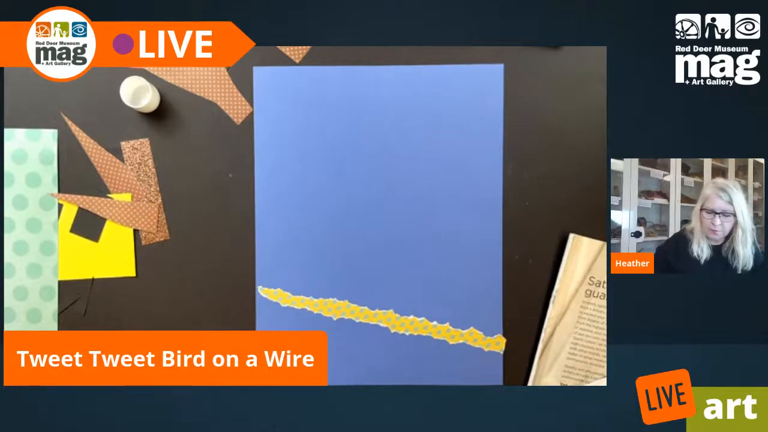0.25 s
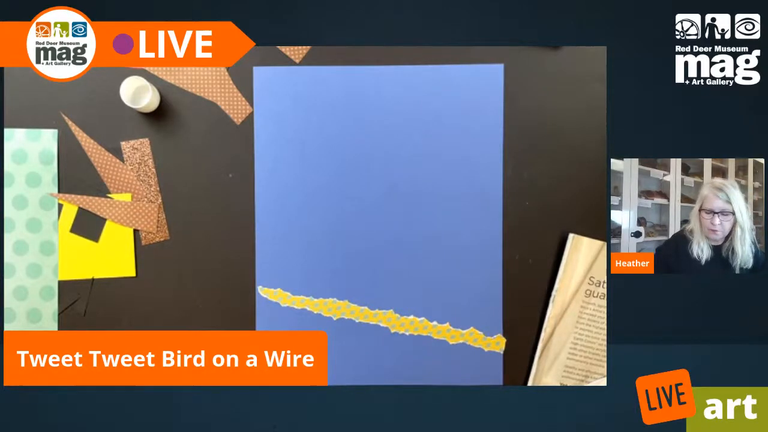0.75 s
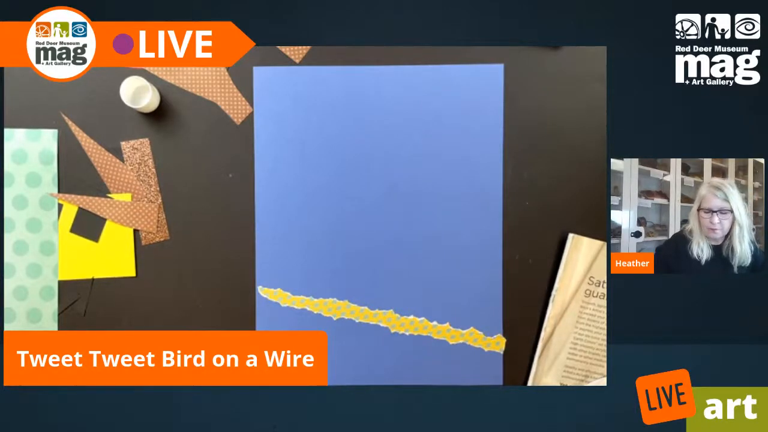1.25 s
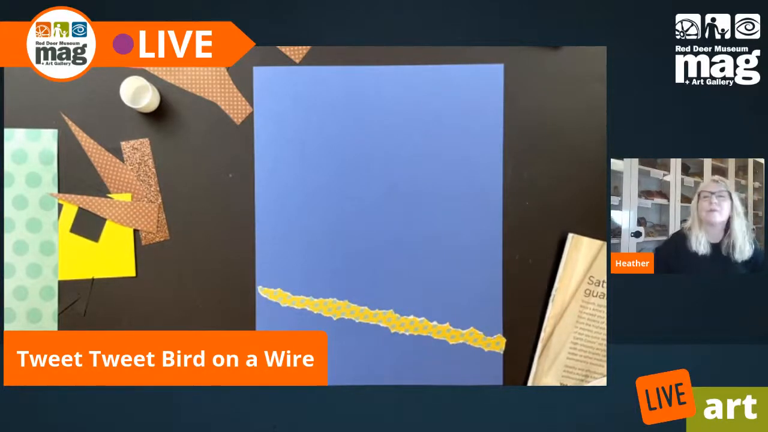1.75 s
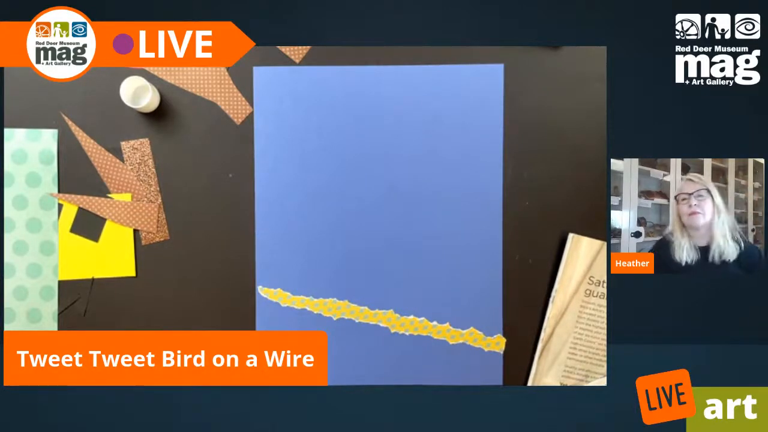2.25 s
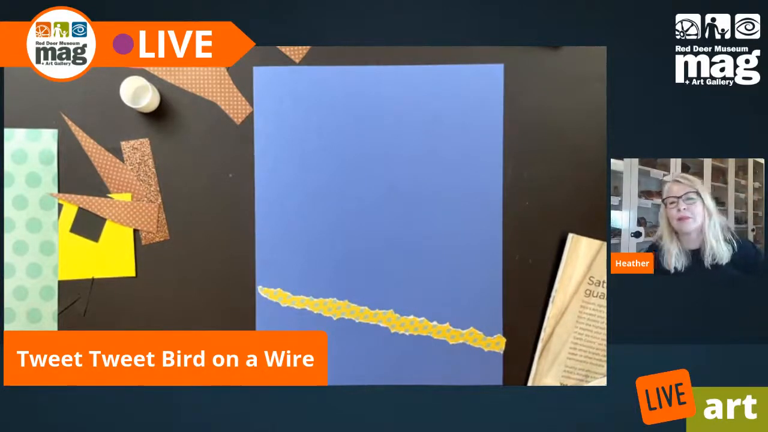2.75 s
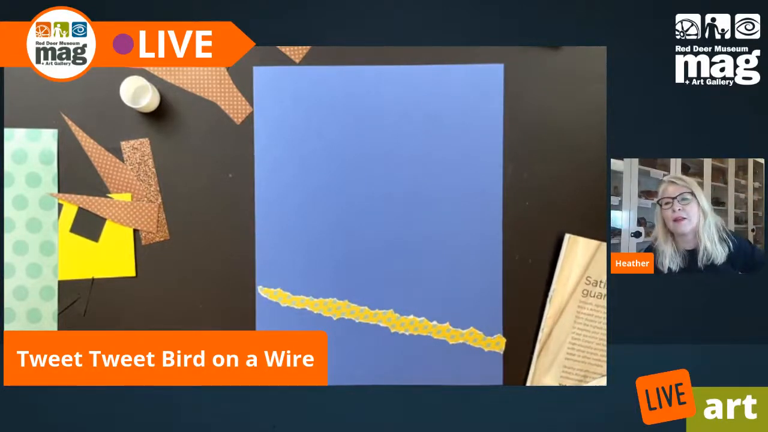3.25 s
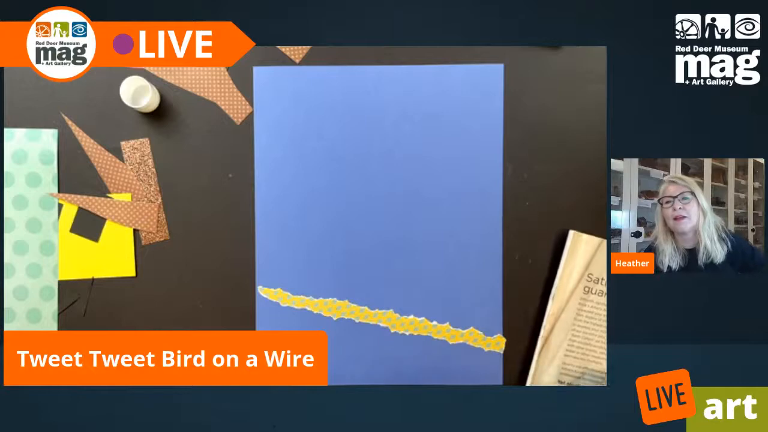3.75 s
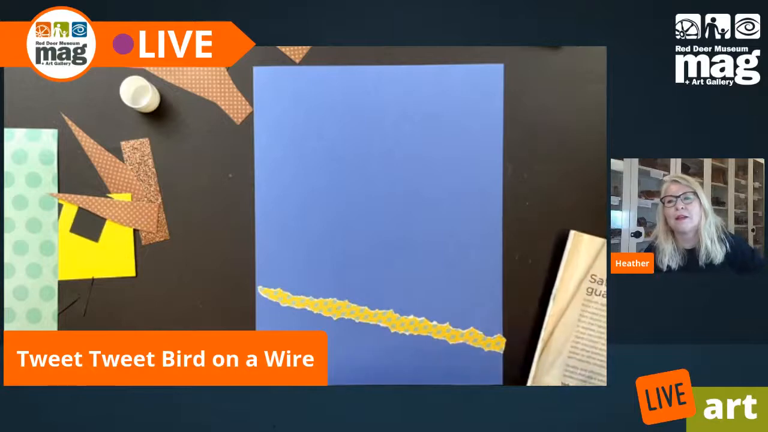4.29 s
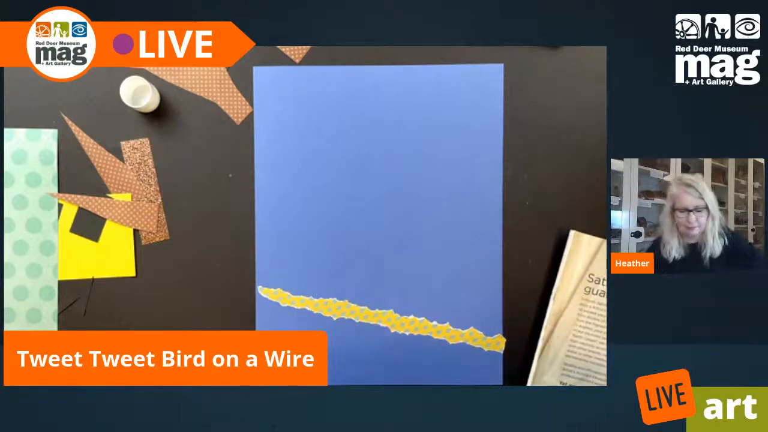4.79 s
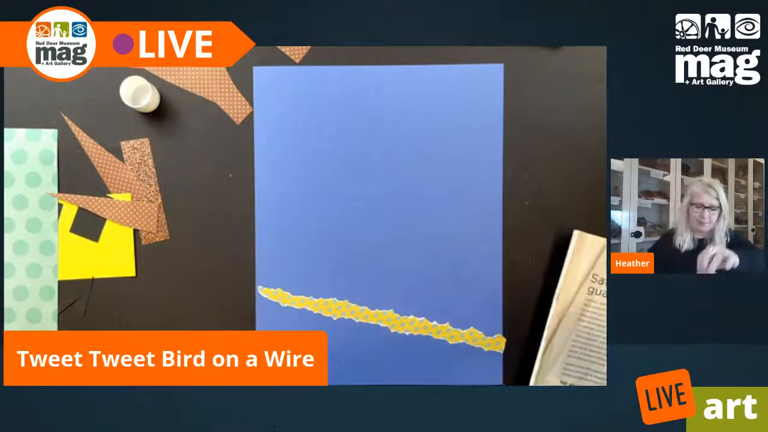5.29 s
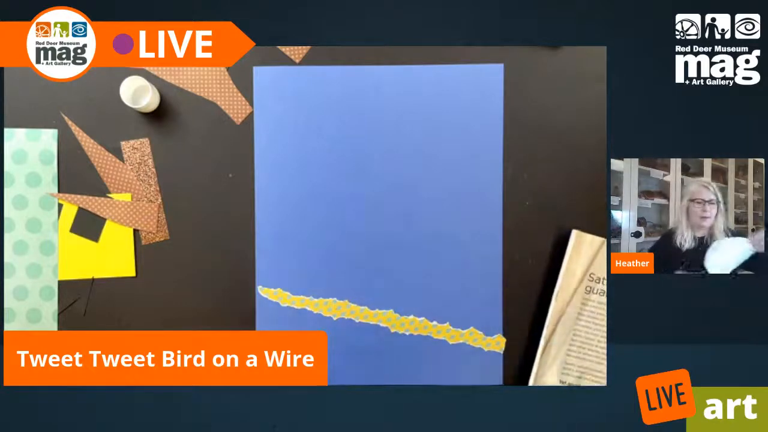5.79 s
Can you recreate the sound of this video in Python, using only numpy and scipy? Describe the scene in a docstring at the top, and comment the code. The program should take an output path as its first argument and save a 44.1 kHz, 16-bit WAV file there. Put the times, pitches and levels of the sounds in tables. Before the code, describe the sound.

A quiet small room, heard closely, with a soft low murmur and a barely audible breathy fan whine throughout. At 0.3, 0.8 and 1.25 seconds a glue stick lands on paper over a table with soft, woody low thuds and very faint rubbing. From 1.65 the landings come about every 0.3 seconds, gentler, each with a dry, bright hissing stroke and tiny sticky ticks, growing clearer until 2.8. At 3.03 a firmer thump with a hollow rap and paper slap; crisp snaps follow at 3.24 and 3.39. A faint scrape swells to 3.6, then sharp paper cracks at 3.8. A hard, short rap at 4.05, a snap at 4.16, and weak scraping fades by 4.5. After a lull, stiff paper crackles loudly from 4.98 to 5.35, strongest near 5.14. Then near silence with a barely perceptible brush, and a small crisp crackle at 6.0.

```python
"""A quiet room, a pile of glossy pages on a table: a glue stick is set down on a paper cut-out and dragged over it.
Strokes hiss as dense grains; the tacky sheet snaps free and is lifted with a crackle of filtered clicks.
Each landing thuds in ringing modes of the table top and slaps the paper; glue threads tick as they let go.
Filtered noise makes the room murmur and a breathy fan whine underneath.
The microphone's noise suppressor darkens the treble after loud moments."""
import sys
import numpy as np
from scipy import signal
from scipy.fft import rfft, irfft
from scipy.io import wavfile
from scipy.ndimage import uniform_filter1d

SR = 44100
rng = np.random.default_rng(int(sys.argv[2]) if len(sys.argv) > 2 else 0)


def store_wav(level_fs):
    """Save 16-bit WAV to argv[1]."""
    pcm = np.round(np.clip(np.atleast_2d(level_fs), -1, 1) * 32767)
    wavfile.write(sys.argv[1], SR, pcm.T.astype(np.int16))


N = 266011
WIDEST_HZ = 710  # the widest folds: lower edge of every snap, slap and tick


def from_db(db):
    """Decibels to gain."""
    return 10 ** (np.asarray(db) / 20)


def rms_one(x):
    """Scale to unit rms."""
    return x / np.sqrt(np.mean(x ** 2) + 1e-20)


def band(x, low_hz, high_hz):
    """Butterworth band-pass."""
    return signal.sosfilt(signal.butter(3, [low_hz, high_hz], "band", fs=SR, output="sos"), x)


def causal(db):
    """Minimum-phase response for gains in dB on an FFT grid, made by folding the cepstrum forward in time."""
    cepstrum = irfft(np.log(from_db(db)))
    half = len(cepstrum) // 2
    cepstrum[1:half] *= 2
    cepstrum[half + 1:] = 0
    return np.exp(rfft(cepstrum))


def coloured(x, spectrum):
    """Filter x causally with the gains of a spectrum table, joined over log frequency; rms 1."""
    hz, db = np.transpose(spectrum)
    grid_hz = np.fft.rfftfreq(8192, 1 / SR) + 1
    grid_db = np.interp(np.log(grid_hz), np.log(hz), db)
    return rms_one(signal.fftconvolve(x, irfft(causal(grid_db)))[:N])


def ring(clicks, hz, t60):
    """A damped resonance: a unit click sets a sine of height 1 ringing."""
    r = from_db(-60 / (t60 * SR))
    w = 2 * np.pi * hz / SR
    return signal.lfilter([0, np.sin(w)], [1, -2 * r * np.cos(w), r * r], clicks + 1e-18)


def grains(per_s, spread_db):
    """Random clicks of uneven size and sign."""
    sizes = from_db(spread_db * np.minimum(rng.exponential(1, N), 4)) * rng.choice([-1, 1], N)
    return sizes * (rng.random(N) < per_s / SR)


def swells(rows, fade_s):
    """Each row rises by 30 dB per rise_s, holds, falls by 30 dB per fade_s; returns main and second levels."""
    t = np.arange(N) / SR
    power = np.zeros((2, N))
    for s, rise_s, hold_s, db, share_db in rows:
        span = slice(int((s - 2 * rise_s) * SR), int((s + hold_s + 2 * fade_s) * SR))
        before = (s - t[span]) / max(rise_s, .002)
        after = (t[span] - s - hold_s) / fade_s
        off = np.maximum(before, after).clip(0)
        power[:, span] += from_db([[db], [db + share_db]] - 30 * off) ** 2
    return np.sqrt(power)


def tent(hz, top_hz, falls):
    """A peak of 0 dB that falls by its own dB per octave below and above."""
    octaves = np.log2(hz / top_hz)
    return -np.maximum(-falls[0] * octaves, falls[1] * octaves)


def snap_colours(hz):
    """Rows of (s, peak dB, spectrum dB, t60 s): body of the fold plus the finest folds, for slaps, ticks and snaps."""
    # Creases snapping: start_s, peak_db, pitch_hz, finest_folds_db (relative), t60_s
    crease_snaps = [(2.6326, -56.5, 1090, -35, 0.029), (2.793, -43.5, 3820, -20, 0.015),
                    (3.078, -38, 3240, -17, 0.018), (3.2326, -52, 3000, -20, 0.024),
                    (3.2383, -24.5, 3370, -14.5, 0.019), (3.2522, -29, 3650, -36, 0.0054),
                    (3.3872, -29.5, 6200, -0.5, 0.012), (3.522, -54.5, 1240, -33, 0.048),
                    (3.7802, -24, 3270, -27, .016), (3.8381, -17, 4700, -6.5, 0.0065),
                    (3.8546, -39.5, 1950, -5, 0.01), (4.1584, -29, 3600, -31, 0.02),
                    (4.9822, -31.5, 2140, -33.5, 0.041), (4.99, -31, 2080, -34.5, 0.052),
                    (5.0065, -22, 3240, -15, 0.073), (5.0123, -12, 2300, -11.5, 0.017),
                    (5.0249, -23.5, 2280, -5.5, 0.037), (5.1039, -28.5, 1790, -31.5, .018),
                    (5.1156, -24, 1710, -29.5, 0.045), (5.122, -18.5, 1300, -28, .023),
                    (5.1245, -22, 2225, -20.5, .028), (5.1368, -22.5, 1926, -11.5, .023),
                    (5.143, -13, 2200, -8.5, 0.022), (5.1452, -16.5, 1057, -7.5, .03),
                    (5.2002, -36, 3590, -25, 0.018), (5.208, -24.5, 2390, -18.5, 0.019),
                    (5.2466, -33.5, 1044, -28, 0.099), (5.2532, -24, 3390, -32, 0.028),
                    (5.2574, -21.5, 3800, -36, 0.043), (5.2729, -27.5, 1900, -35.5, .037),
                    (5.3038, -27.5, 1800, -48, .02), (5.3133, -34.5, 1053, -51, 0.041),
                    (5.3195, -39, 2360, -52, 0.027), (5.3436, -43, 2400, -56, 0.018),
                    (5.3773, -53, 2000, -33, .02), (5.9153, -59, 1570, -25.5, .023),
                    (6.009, -37, 4800, -25, 0.016), (6.02, -35, 4700, -19, .045)]
    # Paper slapped flat under a landing: start_s, peak_db, slope_db_per_octave (about 1 kHz), finest_folds_db (relative)
    paper_slaps = [(0.2707, -50.5, -5, -4.5), (0.7632, -48, -7, -5), (1.2576, -44, -4.5, 2),
                   (1.6494, -40.5, -3.5, -12), (1.9715, -47, -13, -23), (2.2723, -42, -10.5, -21),
                   (2.524, -41, -9, -12.5), (2.7865, -40, -3, -15), (3.036, -29.5, -9, -21),
                   (4.056, -35.5, -10.5, -23)]
    # Glue threads letting go: start_s, peak_db
    thread_ticks = [(1.0527, -51), (1.6763, -48.5), (1.824, -49), (2.1791, -64), (2.302, -47), (2.365, -57),
                    (2.5496, -40), (2.7034, -50), (3.405, -43), (4.2541, -42)]
    finest = tent(hz, 9500, (22, 37.5))
    # the body of a crease falls off faster above this
    dull_above_hz, dull_db_per_octave = 5320, 14.5
    dull = tent(np.maximum(hz, dull_above_hz), dull_above_hz, (0, dull_db_per_octave))
    octaves = np.log2(np.maximum(hz, WIDEST_HZ) / 1000)

    rows = []
    for s, db, slope, fine_db in paper_slaps:
        rows.append((s, db, np.maximum(slope * octaves, fine_db + finest), 0.025))
    for s, db in thread_ticks:
        rows.append((s, db, np.maximum(-17, finest), 0.024))  # flat dull part 17 dB under the finest folds
    for s, db, pitch_hz, fine_db, t60 in crease_snaps:
        body = tent(hz, pitch_hz, (18, 16)) + dull
        rows.append((s, db, np.maximum(body, fine_db + finest), t60))
    return rows


def snaps(rise_s, click):
    """A short faint noise swells into a click, then dies away in uneven noise coloured by the folds."""
    lead, size = 400, 4096  # samples before the click, samples in all
    out = np.zeros(N + size)
    t = (np.arange(size) - lead) / SR
    rows = snap_colours(np.fft.rfftfreq(size, 1 / SR) + 1)
    for (s, db, colour_db, t60), noise in zip(rows, rng.standard_normal((len(rows), size))):
        faint_swell = 0.18 * np.exp(t / rise_s)
        decay = from_db(-60 * t / max(t60, .003))
        burst = noise * np.abs(noise) * np.where(t < 0, faint_swell, decay)
        burst[lead] = click
        fold = band(irfft(rfft(burst) * causal(colour_db)), WIDEST_HZ, 15000)
        start = int(s * SR) - lead
        out[start:start + size] += from_db(db) * fold / np.abs(fold).max()
    return out[:N]


def crackle(cycles):
    """Many small creases give way in clumps while the sheet bends; each rings a few cycles at its own pitch."""
    # Sheet bending: full_bend_s, rise_s, hold_s, level_db, treble_share_db (relative)
    bends = [(3.237, 0.028, 0.0048, -61, 2), (3.252, 0.0082, 0.0016, -50, 7.5),
             (3.39, 0.015, 0.0022, -69, 13.5), (3.778, 0.0083, 0.0086, -57, -9),
             (3.837, 0.012, 0.0073, -43, -8), (4.985, 0.017, 0.0089, -48, -23),
             (5.008, 0.01, 0.0041, -41, 6), (5.04, .02, 0.045, -63, 9), (5.102, 0.015, 0.015, -44.5, -22),
             (5.12, 0.014, 0.025, -36.5, -9.5), (5.138, 0.012, 0.012, -24.5, -9.5),
             (5.156, .01, 0.015, -38, -14), (5.18, .02, 0.032, -40.5, -18), (5.22, 0.022, 0.03, -56, -5.5),
             (5.247, 0.013, 0.016, -31.5, -36), (5.298, 0.051, 0.017, -39, -36),
             (5.33, 0.023, 0.019, -41, -46), (5.382, 0.034, 0.0036, -60.5, -36),
             (6.008, 0.0098, 0.021, -52.5, -2)]
    # Colour of the ringing sheet: frequency_hz, gain_db (relative)
    sheet_colour = [(350, -65.5), (600, -7), (1090, -6.5), (1460, -14), (1700, -1), (2000, -3.5),
                    (2470, 4.5), (4120, -4), (6000, -40.5), (7800, -66), (13200, -120)]
    # Colour of the finest creases: frequency_hz, gain_db (relative)
    fine_colour = [(3500, -12.5), (5000, 8.5), (7000, 0), (9500, -5), (11000, -24), (13000, -15),
                   (15500, -20)]
    level, treble = swells(bends, fade_s=0.012)
    clumps = from_db(2.9 * rms_one(band(rng.standard_normal(N), 45, 390)))
    creases = grains(6000.0, spread_db=4.5) * clumps
    pitches_hz = np.geomspace(1150, 5500, 16)
    dealt = rng.integers(0, 16, N // 60 + 1).repeat(60)[:N]  # a pitch is dealt every 60 samples
    rings = np.zeros(N)
    for k, hz in enumerate(pitches_hz):
        rings += np.sqrt(hz) * ring(creases * (dealt == k), hz, cycles / hz)
    return level * coloured(rings, sheet_colour) + treble * coloured(creases, fine_colour)


def strokes():
    """Glue threads tearing give a dense bright sizzle, the paper fibres a duller scrape; each flutters unevenly."""
    # Glue dragged over paper: full_pressure_s, rise_s, hold_s, level_db, dull_scrape_share_db (relative)
    drags = [(.348, .06, 0.19, -86.5, 6), (.8, .01, 0.047, -86.5, 6), (.91, 0.11, .11, -87, 7.5),
             (1.268, .01, 0.023, -71, -38), (1.362, 0.16, 0.066, -75.5, -3),
             (1.68, 0.015, 0.0051, -62.5, -66), (1.71, .02, 0.097, -86.5, 1),
             (1.822, 0.022, 0.0045, -72, -37), (2.024, 0.087, .008, -74.5, 1.5),
             (2.04, .02, 0.043, -86.5, 3), (2.305, 0.029, 0.034, -66.5, -11),
             (2.409, 0.0088, 0.048, -63.5, -5.5), (2.556, 0.011, 0.026, -64, -15),
             (2.806, 0.015, 0.057, -59, -8.5), (3.045, 0.0084, 0.046, -59.5, -4.5),
             (3.12, 0.018, 0.064, -76.5, 1), (3.26, .01, 0.057, -74, -5), (3.59, 0.23, 0.033, -65.5, -2),
             (3.66, .02, 0.27, -87, 1.5), (3.86, .01, 0.034, -69, 0), (3.9, .03, 0.22, -80, 4.5),
             (4.06, 0.026, 0.026, -69.5, 5), (4.09, .02, 0.058, -76.5, 0.5), (4.19, 0.022, 0.085, -83, 6),
             (4.26, 0.012, 0.01, -69, -15), (4.285, .02, 0.18, -83, 5.5), (5.528, .03, 0.021, -80, -11),
             (5.62, 0.066, 0.47, -94.5, 4)]
    # Colour of tearing threads: frequency_hz, gain_db (relative)
    sizzle_colour = [(3000, -27.5), (6000, -10.5), (7700, -15), (8600, -3.5), (10000, -3.5), (11000, -9),
                     (11900, -27)]
    # Colour of scraped fibres: frequency_hz, gain_db (relative)
    scrape_colour = [(1200, -38), (2000, -2.5), (3600, -4), (5700, -9.5), (7500, -10), (10000, -10)]
    bright, dull = swells(drags, fade_s=0.031)
    bright_flutter, dull_flutter = [
        from_db(depth_db * rms_one(band(rng.standard_normal(N), 5.7, 130))) for depth_db in (1.8, 2.2)]
    sizzle = coloured(grains(7500.0, spread_db=4.0), sizzle_colour)
    scrape = coloured(grains(7500.0, spread_db=-0.5), scrape_colour)
    return bright_flutter * bright * sizzle + dull_flutter * dull * scrape


def blows(events, modes, gain_db, uneven_db, contact_s):
    """Each blow strikes every mode with a strength of its own through a soft contact, then is muffled."""
    s, db, hardness, free_s = np.transpose(events)
    chance = rng.standard_normal((len(s), len(modes)))
    out = np.zeros(N)
    for k, (hz, mode_db, t60) in enumerate(modes):
        clicks = np.zeros(N)
        lift_db = hardness * np.log2(hz / modes[1][0])  # about the second mode
        clicks[(s * SR).astype(int)] = from_db(db + mode_db + lift_db + gain_db + uneven_db * chance[:, k])
        out += ring(clicks, hz, max(t60, .005))
    free = np.full(N, .3)  # gain under the muffling hand
    for start, length in zip(s, free_s):
        free[int((start - .01) * SR):int((start + length) * SR)] = 1
    lowest_hz = modes[0][0]
    softened = band(out, 0.76 * lowest_hz, 0.64 / contact_s)  # a longer contact is duller
    return band(softened, 0.61 * lowest_hz, 9000) * uniform_filter1d(free, size=400)


def thuds():
    """Landings and their rebounds strike the low modes of the table top through a soft contact."""
    # Landings: start_s, level_db (before gain and chance), hardness_db_per_octave, free_s (until the hand muffles)
    landings = [(.2675, -37.5, -10.5, 0.045), (.31, -64, -3, 0.027), (.762, -36.5, -3, 0.062),
                (.805, -46.5, -21, .015), (1.2525, -35.5, -5.5, 0.048), (1.6495, -48, -4, 0.012),
                (1.971, -42, -11, 0.024), (2.2725, -44, -14, 0.058), (2.5245, -45.5, -7, 0.044),
                (2.786, -43, -32, 0.03), (3.0345, -35.5, -8, 0.061), (3.053, -59, 8, .03),
                (3.074, -41, -14, .018)]
    # Modes of the table top: frequency_hz, level_db (relative), t60_s
    table_modes = [(125, 3, 0.11), (156.8, 7.5, 0.133), (198.5, 2, 0.21), (241.9, -0.5, 0.49),
                   (272, -10.5, 0.48), (294.6, -12.5, 0.31), (349, -16.5, 0.39), (432, -1.5, 0.091),
                   (489, -23.5, 0.066)]
    return blows(landings, table_modes, gain_db=-6.0, uneven_db=1.5, contact_s=0.0011)


def rap():
    """The stick, rapped on its side, rings its tube through a short, hard contact."""
    # Raps: start_s, level_db, hardness_db_per_octave, free_s (until the hand muffles)
    side_raps = [(3.034, -39.5, -5, 0.044), (4.0545, -35, -1, 0.043)]
    # Modes of the tube: frequency_hz, level_db (relative), t60_s
    tube_modes = [(317, -14, 0.32), (370, 3.5, 0.065), (508, -10.5, 0.1), (1532, 3, 0.033),
                  (2960, 7.5, 0.0078), (3600, 0, 0.024)]
    return blows(side_raps, tube_modes, gain_db=0, uneven_db=0, contact_s=.00008)


def reverb(x, t60, wet_db, wall_hz):
    """Short diffuse tail of the small room, dulled by the walls."""
    t = np.arange(SR // 2) / SR
    tail = rng.standard_normal(len(t)) * from_db(-60 * t / t60) * (t > .003)
    tail = band(tail, 220, wall_hz)
    return from_db(wet_db) * signal.fftconvolve(x, tail / np.sqrt(np.sum(tail ** 2)))[:N]


def room():
    """Steady murmur of the room in coloured noise, and a breathy fan whine in a narrow band of noise."""
    # Colour of the murmur: frequency_hz, gain_db (relative)
    room_colour = [(15, -52), (25, -14.5), (55, -19.5), (96, -14), (119, -6), (178, 0.5), (281, -8),
                   (399, -7.5), (457, -8.5), (648, -9), (762, -14), (1110, -17), (1300, -24.5),
                   (9550, -46.5), (15500, -53)]
    murmur_db, fan_db = -61.5, -78.5  # rms levels
    fan_hz, fan_width_hz = 1077, 30
    whine = band(rng.standard_normal(N), fan_hz - fan_width_hz / 2, fan_hz + fan_width_hz / 2)
    murmur = coloured(rng.standard_normal(N), room_colour)
    return from_db(murmur_db) * murmur + from_db(fan_db) * rms_one(whine)


def weaken_top(x):
    """The paper sounds are weaker above an edge in the treble."""
    edge_hz, top_db = 11950, -14
    below_edge = signal.sosfiltfilt(signal.ellip(8, .3, 40, edge_hz, fs=SR, output="sos"), x)
    return below_edge + from_db(top_db) * (x - below_edge)


def scene():
    """All sources at one microphone; only the paper gets the room's tail and the weaker top."""
    paper = snaps(rise_s=0.005, click=11.5) + crackle(cycles=28.0) + strokes()
    close = paper + reverb(paper, t60=0.21, wet_db=-21.0, wall_hz=10100)
    return (thuds() + rap() + weaken_top(close) + room())[None]


def suppress(x, memory_s, depth_db, margin_db):
    """Treble far below its recent average counts as noise and is turned down."""
    split_hz = 1400
    treble = signal.sosfilt(signal.butter(4, split_hz, "high", fs=SR, output="sos"), x)
    bass = signal.sosfilt(signal.butter(4, split_hz, "low", fs=SR, output="sos"), x)
    now = uniform_filter1d(treble ** 2, size=600) + 1e-14
    r = np.exp(-1 / (memory_s * SR))
    recent = signal.lfilter([1 - r], [1, -r], now)
    below_db = 10 * np.log10(recent / now + 1e-9) - margin_db
    cut_db = uniform_filter1d(np.clip(below_db, 0, depth_db), size=900)
    return bass + treble * from_db(-cut_db)


def record(dry):
    """Noise suppressor, then the steep top cut."""
    clean = suppress(dry[0], memory_s=.042, depth_db=8.0, margin_db=13.5)
    cutoff_hz = 15550
    return signal.sosfilt(signal.ellip(12, .5, 70, cutoff_hz, fs=SR, output="sos"), clean)[None]


dry = scene()
out = record(dry)
store_wav(out)
```